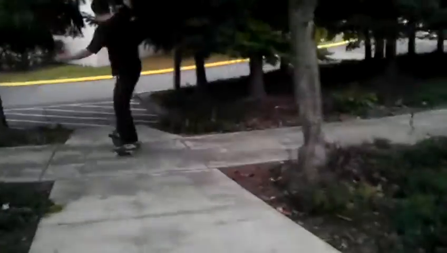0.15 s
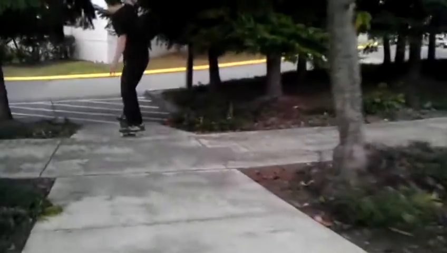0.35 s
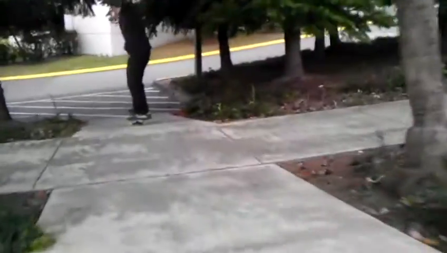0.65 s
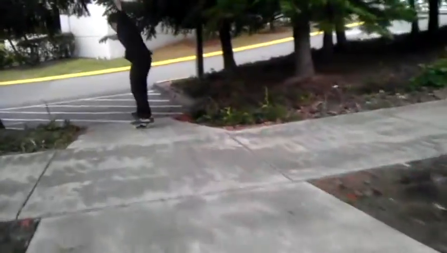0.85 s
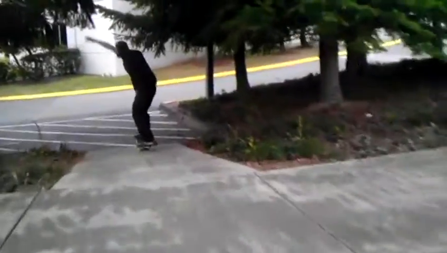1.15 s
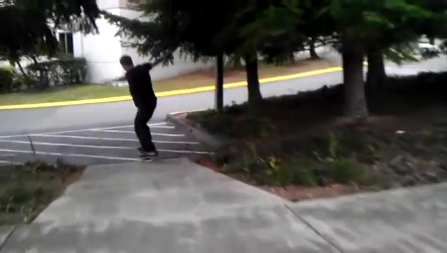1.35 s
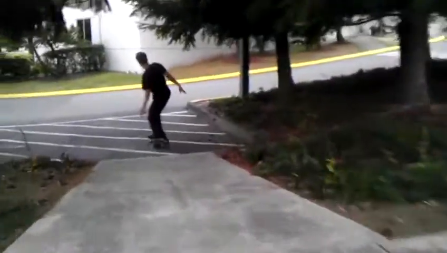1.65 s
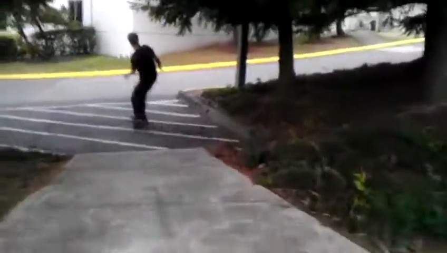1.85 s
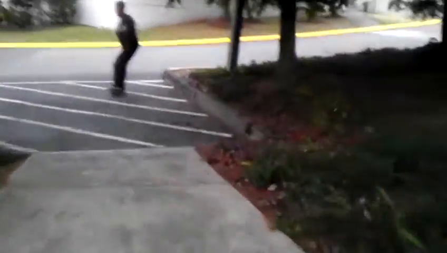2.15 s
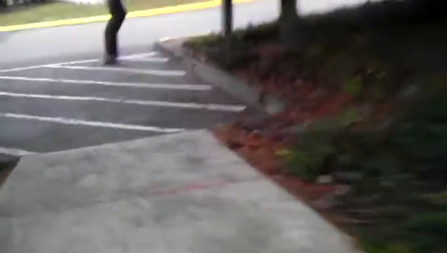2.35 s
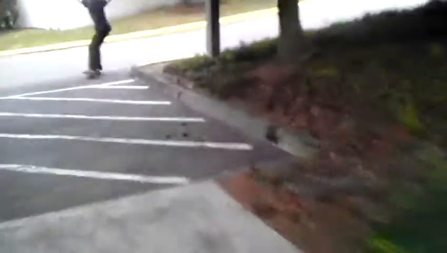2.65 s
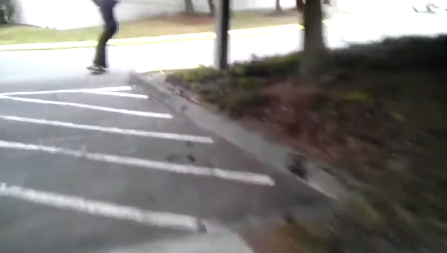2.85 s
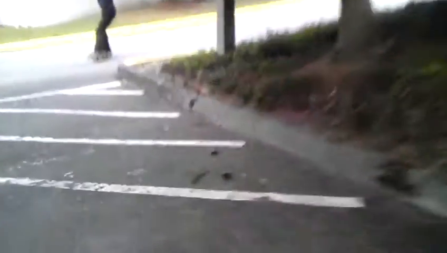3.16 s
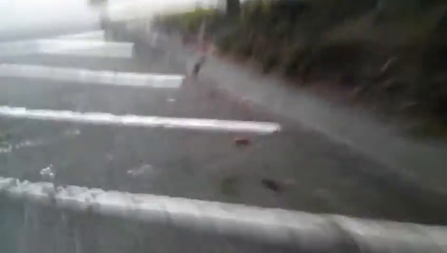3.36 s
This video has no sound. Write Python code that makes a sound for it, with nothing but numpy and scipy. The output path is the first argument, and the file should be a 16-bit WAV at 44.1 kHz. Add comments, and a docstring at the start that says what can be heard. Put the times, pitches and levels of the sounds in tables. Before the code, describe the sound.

Hollow skateboard rumble and gritty wheel hiss run throughout, broken by sharp, uneven double clacks that distort and briefly duck the rolling; midway another skater's wheels rasp ahead, then a faint bright scrub near the end, outdoors.

```python
"""Concrete sidewalk: a skateboard rolls past the slab joints, close under a stereo pair held by its rider.
Rough slabs make the deck rumble, hum and chatter and the wheels hiss; shaped random grains make these. The
front and back wheels clack over each joint and pebbles knock: ringing deck modes, rattle and a noise crack. A
second skater ahead rasps on asphalt, as filtered grains; a brief bright scrub comes near the end. Loud blows
trip the gain control, which ducks the rolling after them, and overload the microphones."""
import sys
import numpy as np
from scipy import signal
from scipy.fft import rfft, irfft
from scipy.io import wavfile
from scipy.ndimage import uniform_filter1d

SR = 44100
rng = np.random.default_rng(int(sys.argv[2]) if len(sys.argv) > 2 else 0)


def wrap_up_sound(samples):
    """Save the sound to the file named by the first command line argument, as 16-bit audio."""
    columns = np.atleast_2d(samples).T
    # keep every value between -1 and 1, then stretch to whole-number steps
    tamed = np.clip(columns, -1, 1)
    steps = np.round(tamed * 32767).astype(np.int16)
    wavfile.write(sys.argv[1], SR, steps)


N = 154350

# Wheels strike a joint: t/s, level/dB, brightness/(dB per octave), crack/dB, ring length/(factor),
# favoured f/Hz, its lift/dB, deck boom/dB, thump/dB
JOINT_CLACKS = [(.047, 0.5, 9.5, 1, 0.99, 1280, 2, -2.5, -20),
                (0.3357, 16, 3, -2.5, 0.74, 590, 5.5, 2.5, 23),
                (0.5186, 15.5, -1.5, 2, 0.71, 1105, 14, -7.5, -20),
                (0.9285, 8, -1, -0.5, 1.44, 555, 3.5, 5, -3), (1.0783, 8, 5, -2, 0.85, 900, -1.5, -3, 18),
                (1.3997, 6.5, 3.5, -1.5, 1.19, 950, 3, 9.5, -15),
                (1.5418, 10.5, -1, -4.5, 0.89, 1030, 7, -5, 29),
                (1.8088, 12, 4.5, -2, 0.88, 900, 4.5, 7, -2),
                (1.9337, 12.5, 2.5, -8.5, 0.69, 823, 6.5, 2, 0), (2.3016, 12, 2, -5, 1.1, 895, 2, 3.5, 24),
                (2.4452, 18, 1.5, -4, 0.81, 1080, 1, 0, 24), (2.7406, 14.5, 3, -8.5, 0.74, 675, 3, 1.5, 0),
                (2.8696, 11.5, -4.5, -7.5, 0.68, 565, 6, -1, -18),
                (3.129, 5.5, 7.5, -3.5, .85, 1200, 4, 8, -15), (3.2294, 10, 0, -4, 1, 810, 4, 1, 22)]
# What deck and trucks ring with: f/Hz, level/dB, t60/s
DECK_MODES = [(216.5, -21, 0.095), (314, -20.5, 0.064), (543.2, -8.5, 0.037), (683, -6.5, 0.022),
              (802, -10, 0.026), (911, -7, 0.027), (1069, -11, 0.021), (1278, -6.5, 0.015),
              (1700, -12, 0.011), (2396, -21, 0.02)]
# Spectral shape of the board's rumble, and of its rattle: f/Hz, level/(dB per Hz)
RUMBLE_SHAPE = [(20, -18), (80, -59.5), (125, -12), (200, -6), (340, -4), (430, -5.5), (545, 1), (680, -3),
                (800, -6.5), (940, -5.5), (1120, -11), (1300, -11), (2000, -24), (3000, -39.5),
                (6000, -103)]
# Spectral shape of the wheels' hiss on grit, and of their crack: f/Hz, level/(dB per Hz)
GRIT_SHAPE = [(100, 8.5), (250, -2.5), (600, -9), (1500, -16), (2000, 0), (2400, 3.5), (2800, -1),
              (3500, 1), (4900, -1), (5500, -10), (8500, -14), (11000, -20.5), (14000, -48)]

# Rolling: uneven pavement, grains, deck hum and chatter; SAME is the share of power common to both sides
LUMP_DB, LUMP_HZ, SWELL_DB, SWELL_HZ = 0.88, 93, 1.5, 34.2
GRAINS_PER_S, GRAIN_SPREAD_DB, GRIT_LUMP_DB, GRIT_SAME = 9000, 2, 1.73, 0.49
HUM_HZ, HUM_WIDTH_HZ, HUM_DB = 553, 42, -7.5
HUM_DRIFT, HUM_DRIFT_HZ = .05, 6.02  # rms drift as a fraction of the pitch, and its rate
CHATTER_PER_S, CHATTER_SPREAD_DB, CHATTER_CLUMP_DB, CHATTER_DB = 220, 0.5, 2, -7
# The skater ahead
AHEAD_SAME, ASPHALT_LUMP_DB, ASPHALT_LUMP_HZ = 0.9, 1.84, 110
# Blows: each blow's ring length scales the decay times
PIVOT_HZ, FOCUS_OCTAVES = 680, 0.13  # centre of the brightness tilt; width of a favoured range
CONTACT_S = 0.00091  # time constant of the onset
RATTLE_DB, RATTLE_T60, CRACK_DB, CRACK_T60, CRACK_SAME = -9, 0.063, -14, 0.034, 0.54
SECOND_WHEEL_S, SECOND_WHEEL_DB = .0054, -11.5
PEBBLE_FAVOUR_DB, PEBBLE_CRACK_DB, PEBBLE_TILT_DB = 7.5, -5.5, 7.5
# Thumps: pitch sags from SAG_FROM_HZ towards THUMP_HZ
THUMP_HZ, THUMP_DB, THUMP_T60 = 43, -31.5, 0.043
SAG_FROM_HZ, SAG_S, THUMP_RISE_S = 113, 0.027, 0.029
# Scrub: centre time, width and level
SCRUB_S, SCRUB_WIDTH_S, SCRUB_DB = 3.024, 0.12, -30
LOW_CUT_HZ = 179  # bass cut on the sound of the boards
# Microphones and their electronics
WIDEN_S, WIDEN_SHARE = .00501, .33
LIMIT_DB, SQUEEZE, DUCK_S = -6, 0.77, 0.018  # threshold, dB of cut per dB over it, smoothing time
HELD_FALL_DB_PER_S = 73.5  # how fast the held overshoot falls, before SQUEEZE
CEILING, DC_BLOCK_HZ, EDGE_HZ = 0.93, 55, 14400


def amp(db):
    """Decibels to gain."""
    return 10 ** (np.asarray(db) / 20)


def unit(x):
    """Scales to rms 1."""
    return x / np.sqrt(np.mean(x ** 2) + 1e-20)


def curve(table, axis=1):
    """One column of a table of times, at every sample."""
    rows = np.array(table)
    return np.interp(np.arange(N) / SR, rows[:, 0], rows[:, axis])


def colour(x, points, size=2048):
    """Causal minimum-phase filter with the given spectrum (f/Hz, level/dB)."""
    hz, db = np.transpose(points)
    log_bins = np.log(abs(np.fft.fftfreq(size, 1 / SR)) + 1)
    log_gain = np.log(amp(np.interp(log_bins, np.log(hz), db)))
    taps = np.fft.ifft(np.exp(np.conj(signal.hilbert(log_gain)))).real[:size // 2]
    return signal.oaconvolve(np.atleast_2d(x), taps[None], axes=1)[:, :x.shape[-1]]


def wander(hz):
    """Random drift of rms 1, rolled off gently above hz."""
    roll_off = (1 + (np.fft.rfftfreq(N, 1 / SR) / hz) ** 2) ** 2
    return unit(irfft(rfft(rng.standard_normal(N)) / roll_off, N))


def fade(t, t60):
    """Decay by 60 dB in t60 seconds."""
    return amp(-60 * t / t60)


def add(mix, s, sound):
    """Mixes a sound in at time s."""
    part = mix[:, round(s * SR):][:, :sound.shape[-1]]
    part += sound[..., :part.shape[1]]


def grains():
    """Dense tiny impacts of uneven size, at random instants."""
    sizes = rng.standard_normal(N) * amp(GRAIN_SPREAD_DB * np.minimum(rng.exponential(1, N), 4))
    return sizes * (rng.random(N) < GRAINS_PER_S / SR)


def pair(same):
    """Grains for two microphones, partly shared."""
    return np.sqrt(same) * grains() + np.sqrt(1 - same) * np.array([grains(), grains()])


def chatter():
    """Clusters of small knocks on coarse stones; each rings the modes of the deck in its own mix."""
    t = np.arange(SR // 10) / SR
    spread_db = CHATTER_SPREAD_DB * np.minimum(rng.exponential(1, N), 2)
    clump_db = CHATTER_CLUMP_DB * wander(SWELL_HZ)
    knocks = amp(spread_db + clump_db) * (rng.random(N) < CHATTER_PER_S / SR)
    out = np.zeros(N)
    for hz, db, t60 in DECK_MODES:
        ring = amp(db) * fade(t, t60) * np.sin(2 * np.pi * hz * t)
        out += signal.oaconvolve(knocks * rng.uniform(-1.03, 1, N), ring)[:N]
    return unit(out)


def rolling():
    """Lumpy concrete shakes the deck, which chatters and hums at its main resonance; wheels hiss on grit."""
    # Roughness of the pavement under the board: t/s, rumble level/dB, grit level/dB
    pavement = [(0, -14, -27), (.12, -23, -33.5), (.24, -20, -30), (.41, -15, -32.5), (.6, -16.5, -31),
                (.79, -17, -29), (1.02, -17, -33), (1.17, -20.5, -38.5), (1.29, -17.5, -32),
                (1.46, -17.5, -34.5), (1.75, -18, -31), (2.03, -22, -43), (2.12, -20, -40.5),
                (2.22, -18, -50), (2.29, -19, -29), (2.66, -17, -30.5), (3.03, -16.5, -30.5),
                (3.35, -16.5, -28.5), (3.5, -24, -34.5)]
    lumps, swell_db = wander(LUMP_HZ), SWELL_DB * wander(SWELL_HZ)
    rumble = unit(colour(grains() * amp(LUMP_DB * lumps + swell_db), RUMBLE_SHAPE))
    # Narrow noise around a drifting pitch
    phase = 2 * np.pi * np.cumsum(HUM_HZ * (1 + HUM_DRIFT * wander(HUM_DRIFT_HZ))) / SR
    hum = wander(HUM_WIDTH_HZ) * np.cos(phase) + wander(HUM_WIDTH_HZ) * np.sin(phase)
    deck = rumble + amp(HUM_DB) * hum + amp(CHATTER_DB) * chatter()
    grit = unit(colour(pair(GRIT_SAME) * amp(GRIT_LUMP_DB * lumps + swell_db), GRIT_SHAPE))
    return deck * amp(curve(pavement, axis=1)) + grit * amp(curve(pavement, axis=2))


def skater_ahead():
    """The other board's wheels rasp on asphalt: lumpy grains, nearly the same at both microphones."""
    # The skater ahead carves onto asphalt: t/s, level/dB
    ahead_level = [(0, -33.5), (1.8, -54), (1.85, -14.5), (1.98, -22.5), (2.06, -30), (2.13, -23.5),
                   (2.21, -21.5), (2.3, -27), (2.5, -25.5), (2.72, -19.5), (2.9, -29.5), (3.5, -35.5)]
    # Spectral shape of the rasp: f/Hz, level/(dB per Hz)
    asphalt_shape = [(100, -30), (700, -0.5), (1200, 18.5), (1550, 19), (1880, 19), (2150, 9), (3000, 2.5),
                     (5000, -11), (12000, -42)]
    lumpy = pair(AHEAD_SAME) * amp(ASPHALT_LUMP_DB * wander(ASPHALT_LUMP_HZ))
    return unit(colour(lumpy, asphalt_shape)) * amp(curve(ahead_level))


def blow(length, focus_hz, focus_db, crack_db, bright_db=0, boom_db=0):
    """A blow cracks at the wheel, rings the deck and rattles the trucks; where it lands favours a pitch."""
    t = np.arange(SR // 5) / SR
    noise = rng.standard_normal((4, len(t)))
    snap = np.sqrt(CRACK_SAME) * noise[3] + np.sqrt(1 - CRACK_SAME) * noise[:2]

    def near(hz, centre_hz):
        """Bell around a pitch, on an octave scale."""
        return np.exp(-(np.log2(hz / centre_hz) / FOCUS_OCTAVES) ** 2)

    def favour(hz):
        """Lift in dB from brightness, favoured pitch and deck boom."""
        tilt_db = bright_db * np.clip(np.log2(hz / PIVOT_HZ), -1, 1)
        return tilt_db + focus_db * near(hz, focus_hz) + boom_db * near(hz, HUM_HZ)

    ring = np.zeros(len(t))
    for k, (hz, db, t60) in enumerate(DECK_MODES):
        mode = fade(t, t60 * length) * np.sin(2 * np.pi * hz * t)
        ring += (-1) ** k * amp(db + favour(hz)) * mode  # neighbouring modes in opposite phase
    rattle_shape = [(hz, db + favour(hz)) for hz, db in RUMBLE_SHAPE]
    rattle = amp(RATTLE_DB) * unit(colour(noise[2], rattle_shape)) * fade(t, RATTLE_T60 * length)
    crack = amp(CRACK_DB + crack_db) * unit(colour(snap, GRIT_SHAPE)) * fade(t, CRACK_T60 * length)
    return (ring + rattle + crack) * (1 - np.exp(-t / CONTACT_S))


def clacks():
    """The front and back wheels hit each joint a moment apart."""
    out = np.zeros((2, N))
    for s, db, bright_db, crack_db, length, focus_hz, focus_db, boom_db, _ in JOINT_CLACKS:
        for lag_s, wheel_db in [(0, 0), (SECOND_WHEEL_S, SECOND_WHEEL_DB)]:
            hit = blow(length, focus_hz, focus_db, crack_db, bright_db, boom_db)
            add(out, s + lag_s, amp(db + wheel_db) * hit)
    return out


def thumps():
    """A soft low thump swells after some of the clacks and sags in pitch."""
    out, t = np.zeros((2, N)), np.arange(SR // 5) / SR
    hz = THUMP_HZ + (SAG_FROM_HZ - THUMP_HZ) * np.exp(-t / SAG_S)
    envelope = np.minimum(t / THUMP_RISE_S, 1) ** 2 * fade(t, THUMP_T60)
    thump = envelope * np.sin(2 * np.pi * np.cumsum(hz) / SR)
    for s, db, *_, thump_db in JOINT_CLACKS:  # several rows set it inaudibly low
        add(out, s, amp(THUMP_DB + db + thump_db) * thump)
    return out


def pebble_knocks():
    """Pebbles under the wheels give single knocks, duller the lower they ring."""
    # Wheels hit a pebble: t/s, level/dB, favoured f/Hz, ring length/(factor)
    pebbles = [(0.2, -8.5, 213, 1.8), (.309, -4.5, 514, 1), (.4555, 2.5, 750, 1.1), (.469, -1, 726, 0.87),
               (.74, -14, 544, 1.6), (.762, -4, 530, 1.1), (0.9389, 4, 1200, 0.87),
               (1.196, -8.5, 760, 0.89), (1.264, -6.5, 550, 1.8), (1.385, -13.5, 575, 1.8),
               (1.793, -1.5, 540, 1.7), (2.108, -14, 537, 1.2), (2.214, -9, 565, 0.59),
               (2.667, -8, 570, 1.1), (2.7112, 4, 620, 0.95), (2.722, -6.5, 1630, 1),
               (3.106, -0.5, 535, 1.1), (3.293, -3, 525, 1.7), (3.318, 4, 627, 1.22),
               (3.352, -4.5, 1050, 1.2), (3.389, -7, 685, 1.5)]
    out = np.zeros((2, N))
    for s, db, focus_hz, length in pebbles:
        bright_db = PEBBLE_TILT_DB * np.log2(focus_hz / PIVOT_HZ)
        add(out, s, amp(db) * blow(length, focus_hz, PEBBLE_FAVOUR_DB, PEBBLE_CRACK_DB, bright_db))
    return out


def scrub():
    """The wheels scrub sideways in a turn with a brief bright hiss."""
    # Spectral shape of the scrub: f/Hz, level/(dB per Hz)
    scrub_shape = [(1500, -13), (2500, -13), (3100, 4), (4700, -3.5), (5600, -14), (12000, -30)]
    swell = np.exp(-((np.arange(N) / SR - SCRUB_S) / SCRUB_WIDTH_S) ** 2)
    lumpy = pair(GRIT_SAME) * amp(GRIT_LUMP_DB * wander(LUMP_HZ))
    return amp(SCRUB_DB) * swell * unit(colour(lumpy, scrub_shape))


def scene():
    """Both boards, with a bass cut on their sound, and the thumps without it."""
    boards = rolling() + skater_ahead() + clacks() + pebble_knocks() + scrub()
    low_cut = signal.butter(2, LOW_CUT_HZ, "highpass", fs=SR, output="sos")
    return signal.sosfilt(low_cut, boards) + thumps()


def record(dry):
    """Two unlike microphones, widening by a short delay, gain control, overload, bass cut and band limit."""
    # Left minus right microphone: f/Hz, level/dB
    port_difference = [(100, 2), (400, 0), (1100, 1), (1700, -4.5), (2300, 2.5), (4900, 5.5), (5600, 0),
                       (8000, -9.5), (13000, -7)]
    left = colour(dry[0], [(hz, db / 2) for hz, db in port_difference])[0]
    right = colour(dry[1], [(hz, -db / 2) for hz, db in port_difference])[0]
    mid, side, t = (left + right) / 2, (left - right) / 2, np.arange(N) / SR
    side = side + WIDEN_SHARE * np.interp(t - WIDEN_S, t, side)
    # Gain control: overshoot of the 5 ms mean level, held at its peaks with a steady fall, then smoothed
    power = abs(uniform_filter1d(mid ** 2, size=220))
    over_db = np.maximum(10 * np.log10(power + 1e-12) - LIMIT_DB, 0)
    fall_db = HELD_FALL_DB_PER_S * t
    held_db = np.maximum.accumulate(over_db + fall_db) - fall_db
    r = np.exp(-1 / (DUCK_S * SR))
    cut_db = SQUEEZE * signal.lfilter([1 - r], [1, -r], held_db)
    ducked = np.array([mid + side, mid - side]) * amp(-cut_db)
    clipped = ducked / (1 + (ducked / CEILING) ** 8) ** (1 / 8)  # overload rounds off the peaks
    bass_cut = signal.butter(4, DC_BLOCK_HZ, "highpass", fs=SR, output="sos")
    blocked = np.clip(signal.sosfilt(bass_cut, clipped), -1, 1)
    band_limit = signal.firwin(255, EDGE_HZ, window=("kaiser", 8), fs=SR)
    return signal.oaconvolve(blocked, band_limit[None], "same")


dry = scene()
out = record(dry)
wrap_up_sound(out)
```